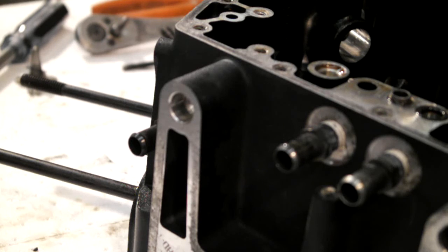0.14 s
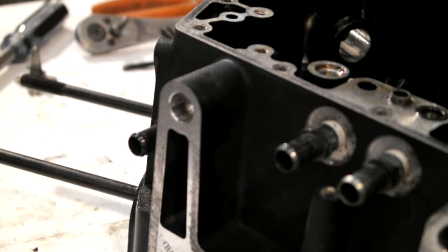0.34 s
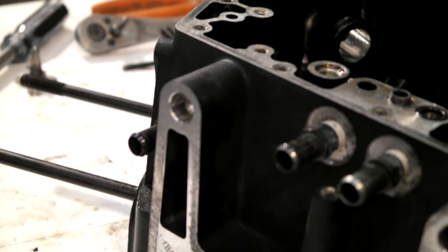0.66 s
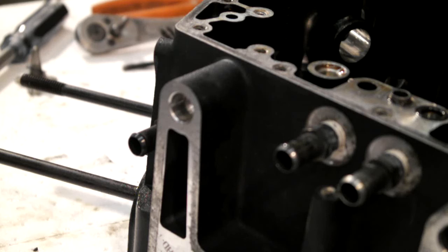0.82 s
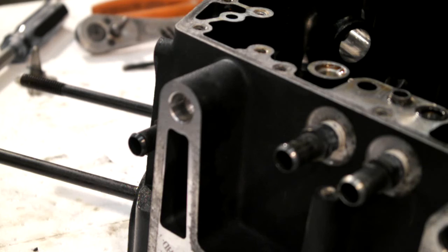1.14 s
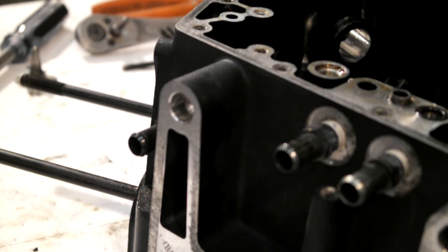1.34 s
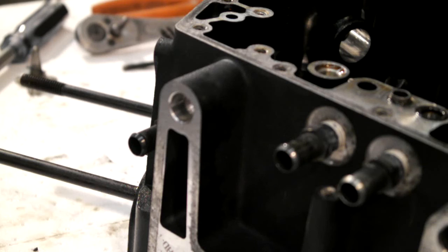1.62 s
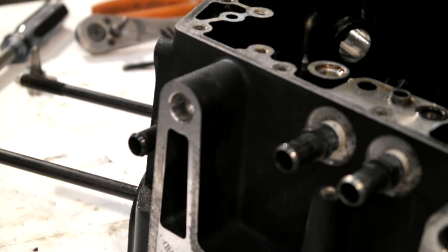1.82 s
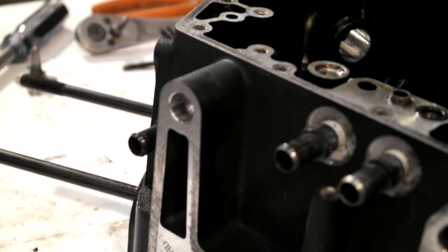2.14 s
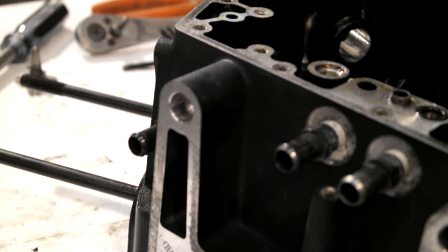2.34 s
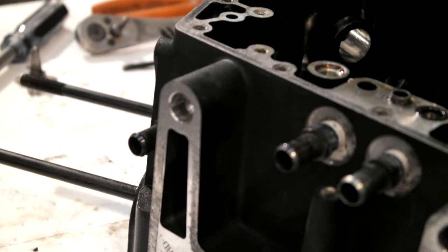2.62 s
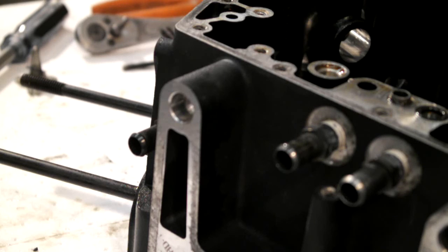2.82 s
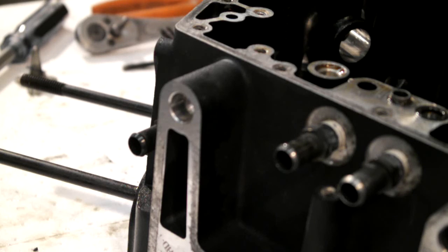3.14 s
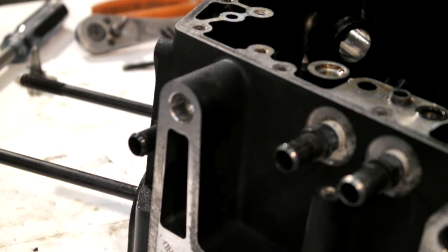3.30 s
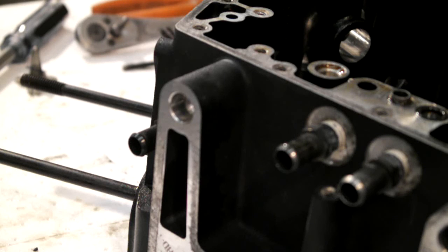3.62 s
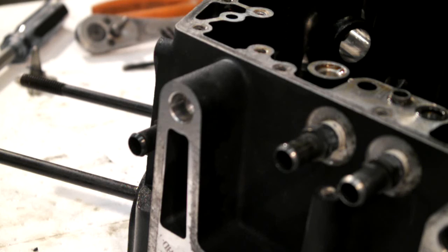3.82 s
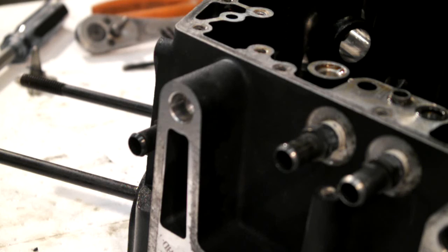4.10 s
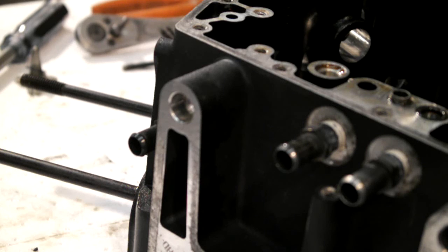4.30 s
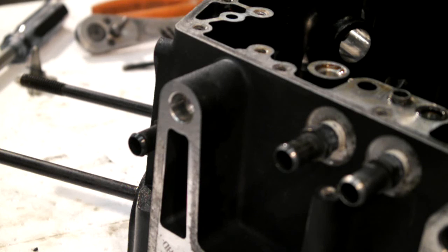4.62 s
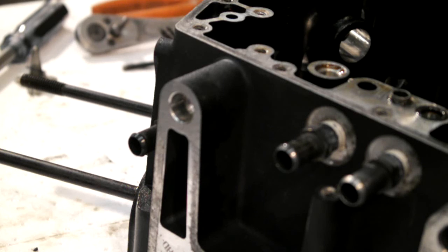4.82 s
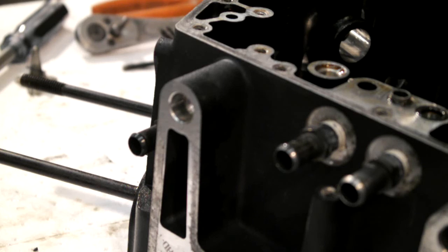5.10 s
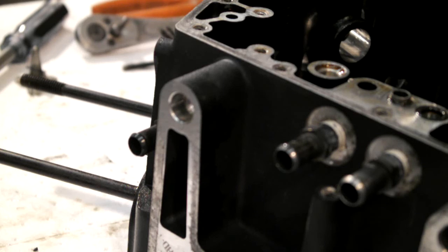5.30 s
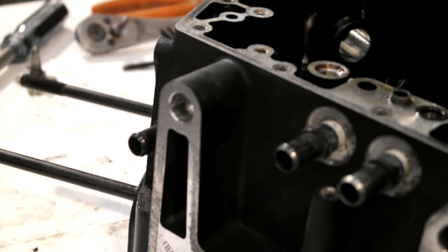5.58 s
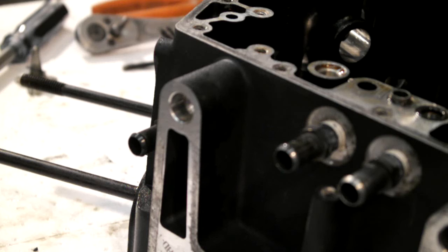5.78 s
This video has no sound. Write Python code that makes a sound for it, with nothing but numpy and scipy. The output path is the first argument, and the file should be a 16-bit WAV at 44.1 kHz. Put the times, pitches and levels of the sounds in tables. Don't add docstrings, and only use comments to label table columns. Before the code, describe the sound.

A garage workshop, heard in stereo on a camera microphone a few steps from a sheet-metal drawer of steel tools. Low building rumble and uneven, soft hiss lie underneath. From 0 to 1.6 s there is only gentle rummaging, with faint touches and a tiny tick around 1.0 s and dull low wall pushes soon after. At 1.67 s heavy tools land with a hard crack; a second, boomier landing at 1.78 s thumps the panels, and sockets ring high and rattle until about 2.0 s while loose parts shake. Muffled bumps follow to 2.3 s, then sparse, quiet sorting with a faint clink at 3.0 s. A light high snap comes at 3.9 s, a gritty drag with a low knock at 4.6 s, small ticks near 4.9 s, and a loud, lower snap at 5.1 s. From 5.65 s a last clatter: ticks, the loudest snap, a knock and bright jingling sockets, fading at 6 s.

```python
import sys
import numpy as np
from scipy import signal
from scipy.fft import rfft, irfft, next_fast_len
from scipy.io import wavfile
from scipy.ndimage import uniform_filter1d, map_coordinates

SR = 44100
rng = np.random.default_rng(int(sys.argv[2]) if len(sys.argv) > 2 else 0)


def ratio_of_db(decibels):
    return 10 ** (np.asarray(decibels, float) / 20)


def store_wav(level_fs):
    pcm = np.round(np.clip(np.atleast_2d(level_fs), -1, 1) * 32767)
    wavfile.write(sys.argv[1], SR, pcm.T.astype(np.int16))


N = 262395
SPAN = 32768


def along(points, hz):
    f, v = np.transpose(points)
    return np.interp(np.log(hz + 1), np.log(f + 1), v)


def unit(x):
    return x / np.sqrt(np.mean(x ** 2) + 1e-20)


def causal(gain):
    cepstrum = irfft(np.log(np.maximum(gain, 1e-6)))
    half = len(cepstrum) // 2
    cepstrum[1:half] *= 2
    cepstrum[half + 1:] = 0
    return np.exp(rfft(cepstrum))


def resonance(f, hz, width):
    return 1j * f * width / (hz * hz - f * f + 1j * f * width)


def place(track, room, s, sound, wet_db, lag=1):
    spectrum = rfft(sound, SPAN)
    heard = spectrum * ratio_of_db(wet_db) * room[rng.integers(len(room))]
    heard[0] += spectrum
    heard[1] += spectrum * np.exp(-2j * np.pi * np.fft.rfftfreq(SPAN) * lag)
    start = round(s * SR)
    track[:, start:start + SPAN] += irfft(heard, SPAN)


# freq_hz [Hz], level_db [dB]
CRACK_COLOUR = [(700, -11.5), (1400, 3.5), (2400, -7.5), (4000, -6.5), (6000, -14.5), (9000, -48.5)]


def steel(f):
    return ratio_of_db(along(CRACK_COLOUR, f))


# mode_hz [Hz], width_hz [Hz], level_db [dB]
DRAWER_MODES = [(430, 130, -3), (595.4, 20, 2.5), (712, 38, -5), (985, 200, -2.5), (1122, 230, -2),
                (1360, 99, 1)]
# freq_hz [Hz], level_db [dB]
EDGE_COLOUR = [(2500, -44), (4500, -1), (6000, 7.5), (8000, 8), (10000, 3.5), (13000, 5.5), (16000, -10.5)]


def strike(track, room, rows, body, length_s, blow_db, gain_db, wet_db):
    size = SPAN // 4
    t, f = np.arange(size) / SR, np.fft.rfftfreq(size, 1 / SR)
    drawer = sum((-1) ** k * ratio_of_db(level) * resonance(f, hz, w) for k, (hz, w, level) in enumerate(DRAWER_MODES))
    for s, db, knock_db, bright_db, panel_hz, crack_hz in rows:
        grit = rng.standard_normal((2, size))
        swell = t / length_s * np.exp(1 - t / length_s)
        slide = swell * grit[0] * ratio_of_db(4.3 * grit[1])
        slide = rfft(slide / np.linalg.norm(slide))
        force = slide + ratio_of_db(blow_db)
        force, slide = [v / causal(uniform_filter1d(abs(v) ** 2, size=24) ** (0.6 / 2)) for v in (force, slide)]

        crack = causal(body(f) * (1 + ratio_of_db(17.5) * abs(resonance(f, crack_hz, 0.83 * crack_hz))))
        nearest = ratio_of_db(3.5) * abs(resonance(f, panel_hz, 76))
        panels = causal((abs(drawer) + nearest) * f ** 2 / (f ** 2 + 350 ** 2))
        dulling_db = 0.62 * bright_db * np.log2(1 + f / 7000)
        bright = causal(ratio_of_db(along(EDGE_COLOUR, f) + dulling_db))

        parts = [irfft(force * crack), irfft(force * panels), irfft(slide * bright)]
        peaks = [np.sqrt(uniform_filter1d(p ** 2, size=128).max()) for p in parts]
        sound = sum(ratio_of_db(d) * p / top for d, p, top in zip((0, knock_db, bright_db), parts, peaks))
        place(track, room, s, ratio_of_db(db + gain_db) * sound, wet_db)


# [Hz, loudest panel]
CONTACTS = [
    (1.6666, -12, -6.5, -14, 1010),
    (1.6719, -15, -1.5, -13.5, 980),
    (1.6806, -28.5, -11, 2, 1130),
    (1.7764, -20, 7.5, -9, 764),
    (1.7864, -17.5, 3, -13, 714),
    (1.8163, -24, -2, -9, 710),
    (1.9622, -23.5, -1, -15, 1326),
    (5.1107, -39, 9, -29, 993),
    (5.6854, -25, -0.5, -16, 1024),
    (5.7561, -52, -15, 15, 1360),
]


def heavy_tools(track, room):
    rows = [(*row, 1910) for row in CONTACTS]
    strike(track, room, rows, steel, length_s=0.0026, blow_db=-4, gain_db=-3.5, wet_db=1.0)


# [Hz, crack centre]
TICKS = [(1.068, -46.5, -9.5, -10, 2910), (1.7804, -15.5, -21, -8, 3780), (3.0095, -52, -15, -12, 4550),
         (4.805, -38, -25.5, -17, 3990), (4.8835, -28.5, -14, -1.5, 3080), (4.8839, -38, 6.5, -0.5, 5490),
         (5.6505, -35, -21, -2, 4230), (5.772, -33, -25, -17, 5830), (5.89, -34, 2, -9, 5540),
         (5.897, -42.5, -5, -8, 3050), (5.657, -61, -23, 1, 5000)]


def small_parts(track, room):
    rows = [(*row[:-1], 988, row[-1]) for row in TICKS]  # panel, Hz
    strike(track, room, rows, steel, length_s=0.0026, blow_db=-4, gain_db=-3.5, wet_db=1.0)


# mode_hz [Hz], width_hz [Hz], level_db [dB]
UPPER_PANEL_MODES = [(1880, 65, -6), (2100, 12, -15), (2460, 49, -2), (2610, 20, -1), (2910, 8.2, -11.5),
                     (3370, 30, -20), (3560, 28, -27), (3950, 27, -7), (4250, 62, -21), (4960, 56, -11),
                     (6640, 37, -14)]


def holder(f):
    damping_hz = 70
    panel_modes = sum(ratio_of_db(db) * abs(resonance(f, hz, w + damping_hz)) for hz, w, db in UPPER_PANEL_MODES)
    return ratio_of_db(-1) * steel(f) + panel_modes


# [Hz, crack centre]
SNAPS = [
    (3.9267, -28.5, -12, -16.5, 4020),
    (5.098, -14.5, -11.5, -18, 2330),
    (5.6762, -12.5, -20, -17, 2840),
]


def holder_snaps(track, room):
    rows = [(*row[:-1], 1150, row[-1]) for row in SNAPS]  # panel, Hz
    strike(track, room, rows, holder, length_s=0.0015, blow_db=-4, gain_db=-3.0, wet_db=-2.0)


# [Hz, loudest panel]
DRAGS = [(1.4997, -53.5, 1.5, -13, 720), (1.53, -53, 2, -15, 600), (1.5594, -54.5, 3, -13, 576),
         (3.2834, -55, -6, -9.5, 450), (4.3046, -57, 5.5, -13, 462), (4.589, -31.5, 2, -5.5, 465),
         (4.6079, -29, 1.5, 2.5, 1080), (4.6244, -31, -5.5, 2.5, 850), (4.8723, -41, -24, -19, 972),
         (5.7744, -32.5, -7.5, -14, 1330), (2.218, -45.5, 6, -24, 716)]


def dragged_tools(track, room):
    rows = [(*row, 2230) for row in DRAGS]
    strike(track, room, rows, steel, length_s=0.0077, blow_db=-24, gain_db=-5.0, wet_db=-1.0)


# [Hz, loudest panel]
TOUCHES = [(0.9994, -59.5, -10, 1, 1180), (1.1473, -55, 1, 0, 626), (1.9747, -32, -1, -8, 450),
           (2.029, -43.5, -0.5, -23, 445), (2.2288, -46.5, 6.5, -16, 1204), (2.2398, -46.5, 3.5, -15, 470),
           (2.799, -68, -5, 5, 509), (3.1644, -61.5, 3.5, -7, 1020), (3.2158, -57, 3, -5, 980),
           (3.267, -48.5, 2, -12, 436), (3.554, -51.5, -5, -10, 714), (3.669, -63.5, 5, -6, 1070),
           (3.9444, -38, -1.5, -20, 1350), (4.137, -55.5, 6, -4, 970), (4.2401, -61.5, 9, -4, 460),
           (5.028, -47, 3, -3.5, 430)]


def soft_touches(track, room):
    rows = [(*row, 2230) for row in TOUCHES]
    strike(track, room, rows, steel, length_s=0.0043, blow_db=-15.5, gain_db=-2.5, wet_db=1.5)


SOCKET_HZ = [
    [7590, 7757],
    [8640],
    [9610],
    [13265],
    [9890, 10450, 9640],
    [10960, 11100, 11480, 10760, 11900],
    [13290, 13845, 13580, 12880, 14150, 12500],
]
# rattle [share 0-1], then modes of level_db [dB], t60_s [s]
SOCKET_MODES = [
    (.03, [(0, 1.0), (-18, .3)]),
    (.03, [(0, .85)]),
    (.03, [(0, .75)]),
    (.08, [(5.5, .4)]),
    (.45, [(6.5, 0.18), (-1, .15), (-7, .2)]),
    (.6, [(-1, 0.22), (3.5, 0.23), (3.5, .12), (-6, .2), (-8, .15)]),
    (0.55, [(5, .3), (1, .3), (-6, .2), (-10, .2), (-5, .15), (-12, .2)]),
]
# [s, until a neighbour damps it]
SOCKET_BLOWS = [
    [(1.850, -36, .105)],
    [(1.860, -45, .34)],
    [(1.893, -40, .36)],
    [(1.893, -31, .035), (3.013, -52, .02), (3.030, -66, .09)],
    [(1.882, -48, .3), (1.893, -34.5, .4), (5.757, -44, .2), (5.770, -32, .2), (5.795, -41, .2)],
    [(1.832, -44, .1), (1.868, -34.5, .1), (1.895, -36.5, .1), (1.925, -36.5, .1), (1.965, -45, .1),
     (5.757, -33.5, 0.22), (5.785, -35.5, .2), (5.82, -42, .1)],
    [(1.832, -44, .05), (1.860, -39, .04), (1.885, -36, .05), (1.940, -46, 0.087), (2.0, -52, .08),
     (5.757, -30.5, .2), (5.790, -43, .2)],
]


def sockets(track, room):
    t = np.arange(SPAN // 2) / SR
    for tones, (rattle, modes), blows in zip(SOCKET_HZ, SOCKET_MODES, SOCKET_BLOWS):
        for s, db, free_s in blows:
            knots = rng.standard_normal((len(modes), 2, 128))
            ring = 0
            for hz, (level_db, t60), pair in zip(tones, modes, knots):
                a, b = [map_coordinates(k, [t * 300], mode="wrap") for k in pair]
                turn = 2 * np.pi * hz * t
                tone = (1 - rattle + rattle * a) * np.sin(turn) + rattle * b * np.cos(turn)
                ring = ring + ratio_of_db(level_db - 60 * t / t60) * tone
            caught = ratio_of_db(-60 * np.maximum(t - free_s, 0) / 0.04)
            onset = 1 - np.exp(-t / 0.002)
            place(track, room, s, ratio_of_db(db) * onset * caught * ring, wet_db=-9, lag=0.7)


# wall_hz [Hz], t60_s [s], then pushes of start_s [s], level_db [dB peak]
WALLS = [
    (450, 0.15, [(1.671, -21), (1.781, -30.5), (1.965, -30), (2.025, -37.5), (2.184, -41.5), (2.225, -39), (3.271, -46.5), (3.723, -58.5), (3.931, -45.5), (4.272, -47.5), (4.589, -29.5), (5.035, -47)]),
    (311.7, .28, [(1.201, -53.5), (1.671, -27), (1.814, -24.5), (2.214, -46), (4.619, -39), (4.883, -44.5)]),
    (270.8, .26, [(1.34, -46.5), (1.529, -56), (1.778, -23), (1.961, -41), (4.594, -38), (5.104, -50)]),
    (193.2, 0.31, [(1.152, -44), (1.779, -27), (1.849, -48)]),
    (140.8, 0.46, [(1.184, -43.5), (1.778, -31.5), (1.849, -32.5), (5.49, -47), (5.899, -46.5)]),
]


def cabinet(track, room):
    t = np.arange(SPAN // 2) / SR
    for wall_hz, t60, pushes in WALLS:
        for (s, db), bend in zip(pushes, rng.standard_normal(len(pushes))):
            beat = 1 + 0.5 * np.cos(2 * np.pi * 0.074 * wall_hz * t + 3 * bend)
            ring = beat * np.sin(2 * np.pi * wall_hz * (1 + 0.02 * bend) * t)
            onset = 1 - np.exp(-t / 0.0035)
            place(track, room, s, ratio_of_db(db - 60 * t / t60) * onset * ring, wet_db=-10)


def widened(pair, alike, f):
    turn = np.arccos(np.clip(along(alike, f), -0.99, 0.99)) / 2
    middle, side = np.cos(turn) * pair[0], np.sin(turn) * pair[1]
    return np.array([middle + side, middle - side])


# freq_hz [Hz], t60_s [s]
GARAGE_DECAY = [(150, 1), (500, 0.38), (1400, 0.42), (4000, 0.44), (10000, 0.31)]
# freq_hz [Hz], likeness [-1 to 1]
ECHO_LIKENESS = [(60, 0.81), (130, 0.93), (290, 1), (640, 0.86), (1410, 0.6), (3100, -0.049), (6820, -0.14),
                 (15000, -0.33)]


def echo():
    size = SPAN // 2
    hz, t, z = signal.stft(rng.standard_normal((2, size)), SR, nperseg=256)
    decay = ratio_of_db(-60 * t / along(GARAGE_DECAY, hz)[:, None])
    tail = signal.istft(z * decay, SR, nperseg=256)[1][:, :size]
    tail *= 1 - np.exp(-np.arange(size) / SR / 0.00052)
    spectra = rfft(tail / np.linalg.norm(tail[0]), SPAN)
    return widened(spectra, ECHO_LIKENESS, np.fft.rfftfreq(SPAN, 1 / SR))


# freq_hz [Hz], likeness [-1 to 1]
FLOOR_LIKENESS = [(60, 0.86), (130, 0.94), (290, 0.45), (640, 0.24), (1410, 0.3), (3100, 0.15),
                  (6820, 0.014), (15000, -0.32)]


def rush(colour, patchy_db):
    m = next_fast_len(N + SR)
    z = signal.stft(rng.standard_normal((2, m)), nperseg=512)[2]
    patches = uniform_filter1d(rng.standard_normal(z.shape[1:]), size=5, axis=0)
    patches = unit(uniform_filter1d(patches, size=8, axis=1))
    pair = signal.istft(z * ratio_of_db(patchy_db * patches), nperseg=512)[1][:, :m]
    f = np.fft.rfftfreq(m, 1 / SR)
    spectra = rfft(pair) * ratio_of_db(along(colour, f))
    return unit(irfft(widened(spectra, FLOOR_LIKENESS, f), m)[:, :N])


# freq_hz [Hz], level_db [dB per Hz]
RUMBLE = [(12, -27.5), (20, 2), (38, 3.5), (65, -13), (92, -5.5), (123, -15.5), (151, -6.5), (367, -32.5),
          (403, -19.5), (431, -33), (500, -41), (650, -64.5), (1100, -120)]
SHUFFLE = [(150, -36), (300, -2), (700, -5), (1400, -5.5), (2200, -18.5)]
RUSTLE = [(1000, -25), (1700, 3.5), (3000, 1), (6000, -4), (8500, -29.5)]
HISS = [(4000, -26), (6500, -1), (10000, -2.5), (13000, -4.5), (15000, -3.5)]
JOLT = [(150, -21), (300, -3.5), (750, 0), (1100, -8), (2200, -22)]
# [dB, effort]
OPENING = [(0, 7, 2.5), (0.65, 3.5, -1.5), (1.1, 0.5, -1.5), (1.6, -7, -2), (2.1, 10, 2.5), (2.45, 5, -0.5),
           (3.0, -2, -2), (3.45, -10.5, -3.5), (3.93, -11, -4.5), (4.12, 1.5, 0.5), (4.5, -3, -2),
           (4.8, 10.5, 2.5), (5.2, 6, -1.5), (5.5, 7, 1), (5.95, 0, 6)]
# start_s [s], level_db [dB], t60_s [s]
SHAKES = [
    (1.80, -22, 0.29),
    (1.9, -34, 0.31),
    (4.82, -63, 0.98),
    (5.79, -52, 0.57),
]


def background():
    t = np.arange(N) / SR
    time_s, *cols = np.transpose(OPENING)
    open_db, hand_db = [np.interp(t, time_s, c) for c in cols]
    shake = 0
    for s, db, t60 in SHAKES:
        since = np.maximum(t - s, 0)
        shake = shake + ratio_of_db(db - 60 * since / t60) * (1 - np.exp(-since / 0.033))

    shuffle = ratio_of_db(-61.5 + hand_db)
    rustle = ratio_of_db(-65.5 + hand_db + 0.19 * open_db) + ratio_of_db(-3) * shake
    hiss = ratio_of_db(-69 + open_db) + ratio_of_db(-20) * shake
    rumble = ratio_of_db(-50.5 + 0.4 * open_db) + ratio_of_db(-7.5) * shake
    rummage = shuffle * rush(SHUFFLE, patchy_db=0.0) + rustle * rush(RUSTLE, patchy_db=-1)
    jolt = ratio_of_db(3.5) * shake * rush(JOLT, patchy_db=5.5)
    return rumble * rush(RUMBLE, patchy_db=1.16) + rummage + jolt + hiss * rush(HISS, patchy_db=1.2)


def scene():
    track = np.zeros((2, N + SPAN))
    room = [echo() for _ in range(16)]
    for source in (heavy_tools, small_parts, holder_snaps, soft_touches, dragged_tools, cabinet, sockets):
        source(track, room)
    return track[:, :N] + background()


def band_limit(x):
    return signal.sosfilt(signal.butter(12, 15640, fs=SR, output="sos"), x)


# notch_hz [Hz], width_hz [Hz], depth_db [dB]
CAVITY = [(1594, 664, -11.5), (3195, 550, -6), (4760, 260, -9)]
# freq_hz [Hz], left_minus_right_db [dB]
CAPSULE_TILT = [(100, -2), (700, -1.65), (4000, -1.5), (10000, 0.5)]


def record(dry):
    m = next_fast_len(N + SR // 4)
    f = np.fft.rfftfreq(m, 1 / SR)
    cavity = np.prod([1 - (1 - ratio_of_db(db)) * resonance(f, hz, w) for hz, w, db in CAVITY], axis=0)
    sides = ratio_of_db(along(CAPSULE_TILT, f) * np.array([[0.5], [-0.5]]))
    low_cut = f ** 2 / (f ** 2 + 18 ** 2)
    top_cut = 1 / (1 + (f / 15150) ** 120)
    mix = irfft(rfft(dry, m) * cavity * sides * low_cut * top_cut, m)[:, :N]
    return band_limit(mix)


dry = scene()
out = record(dry)
store_wav(out)
```